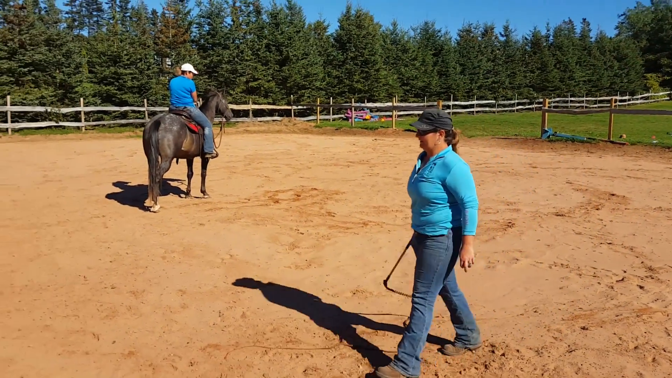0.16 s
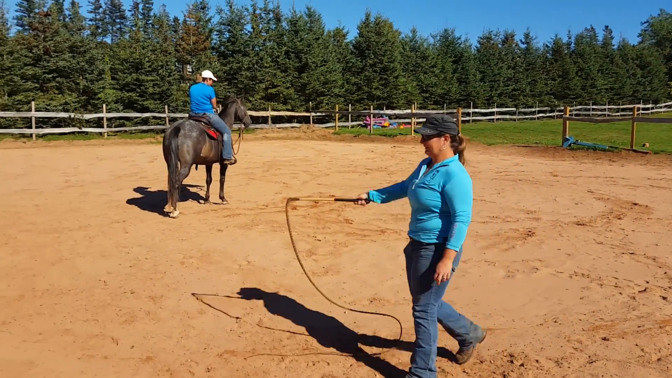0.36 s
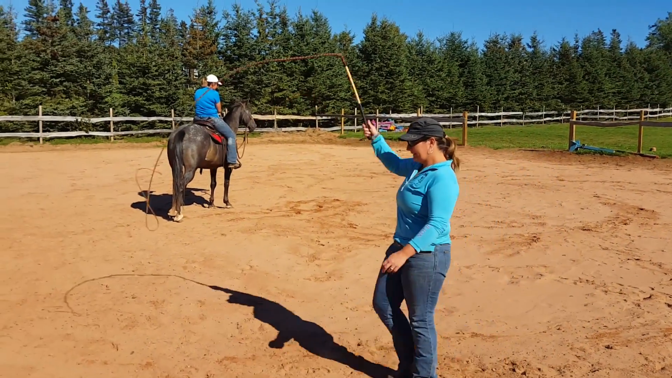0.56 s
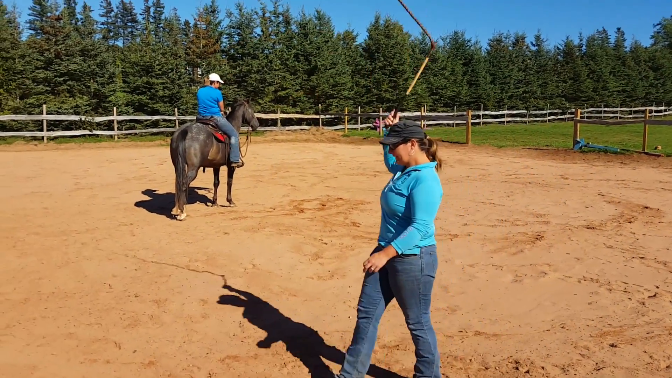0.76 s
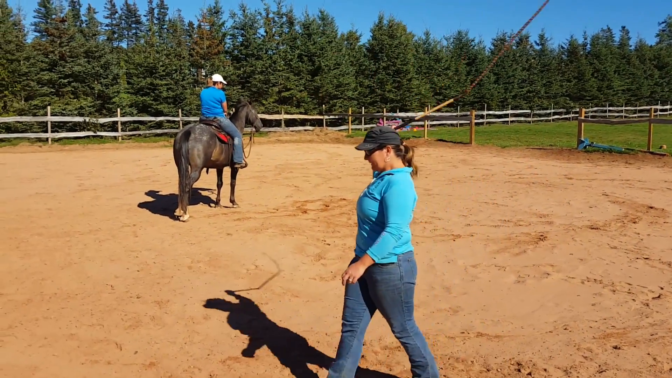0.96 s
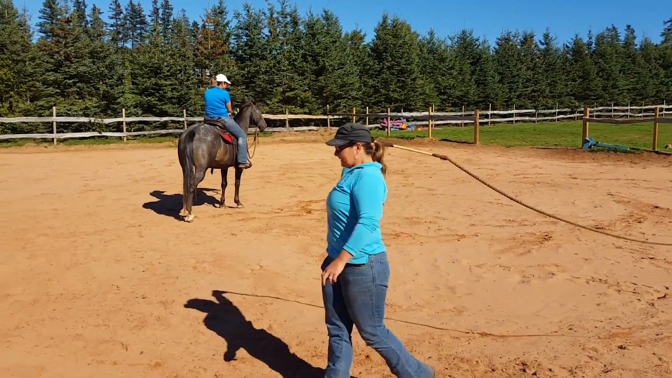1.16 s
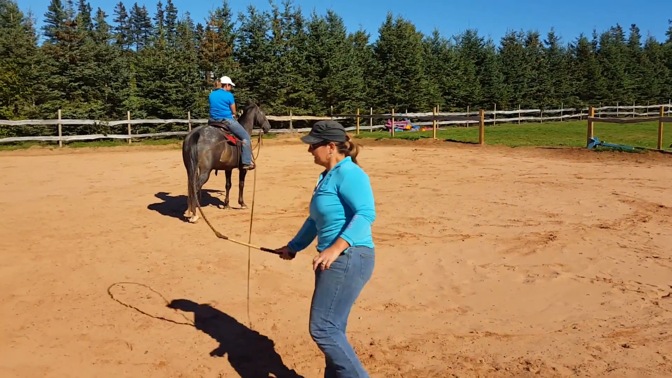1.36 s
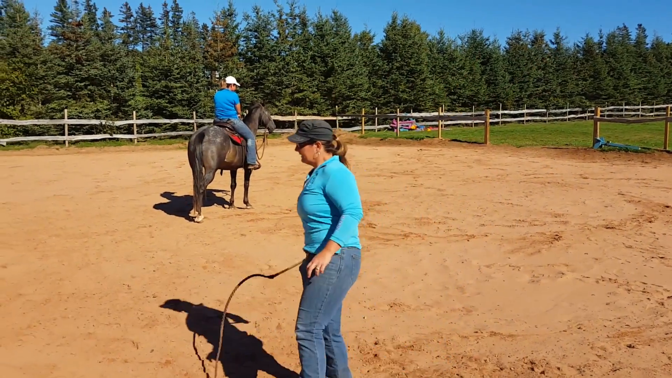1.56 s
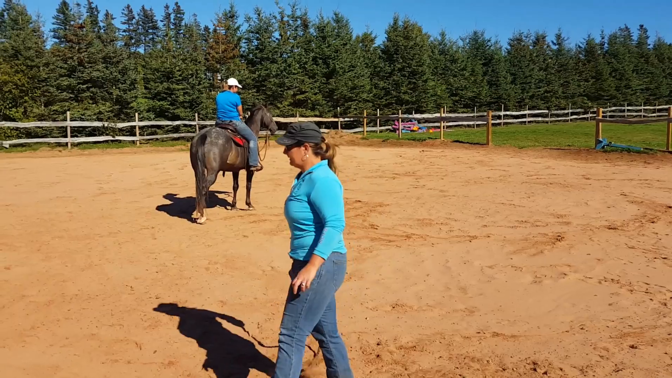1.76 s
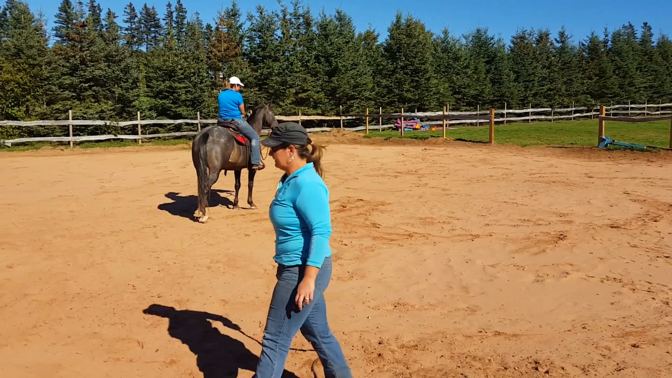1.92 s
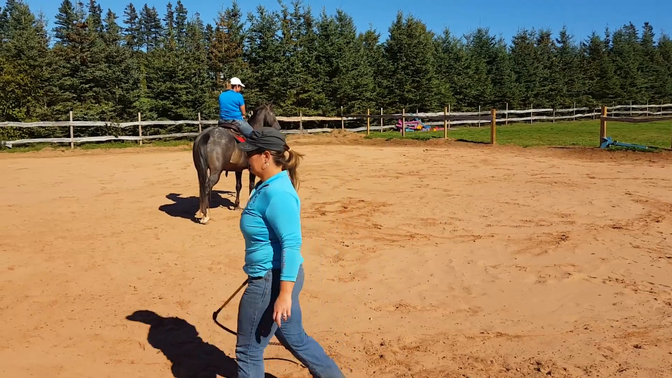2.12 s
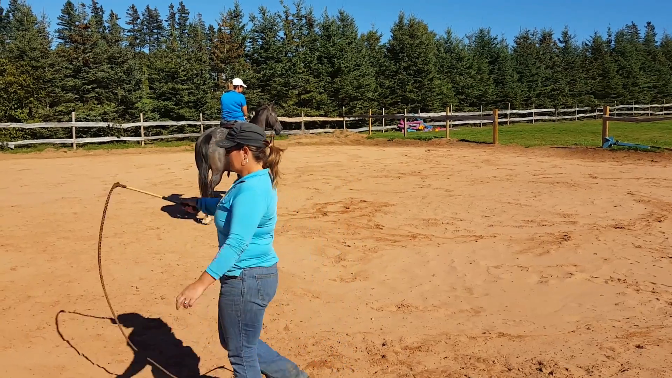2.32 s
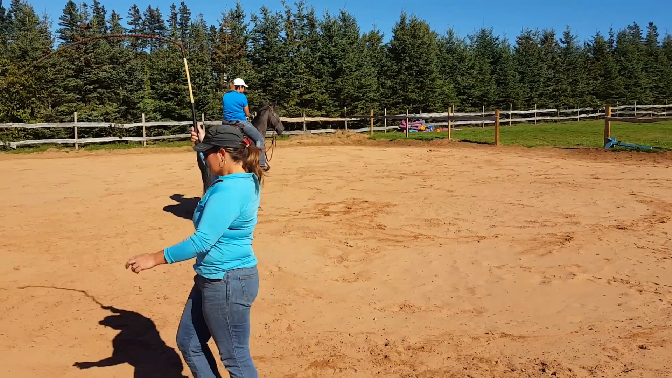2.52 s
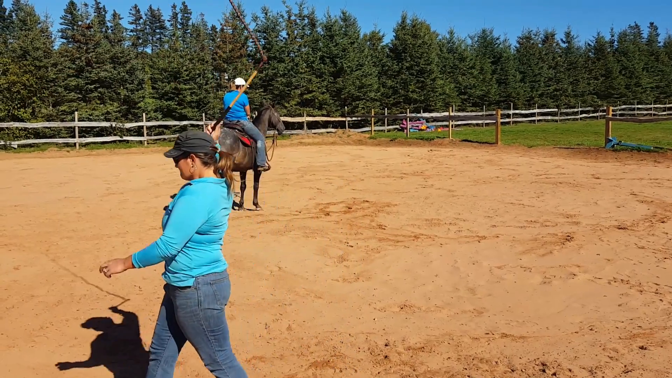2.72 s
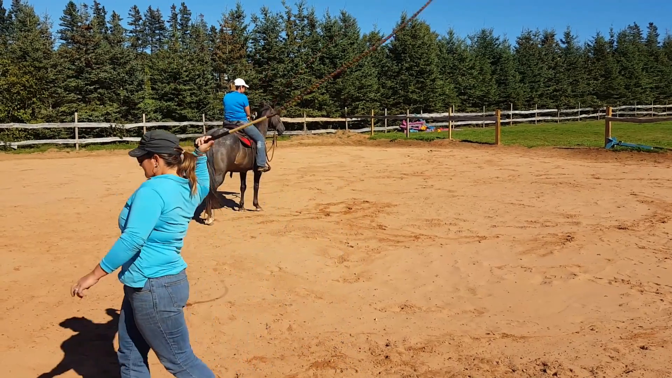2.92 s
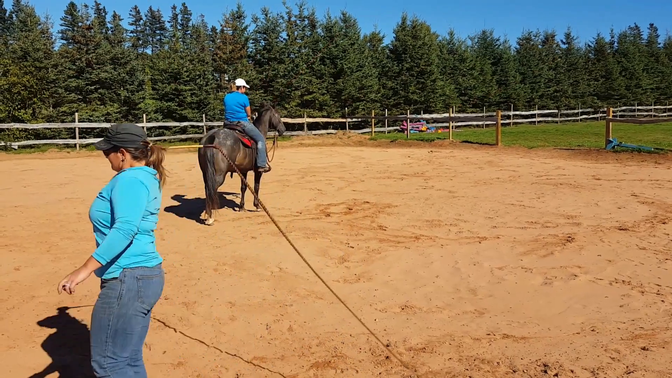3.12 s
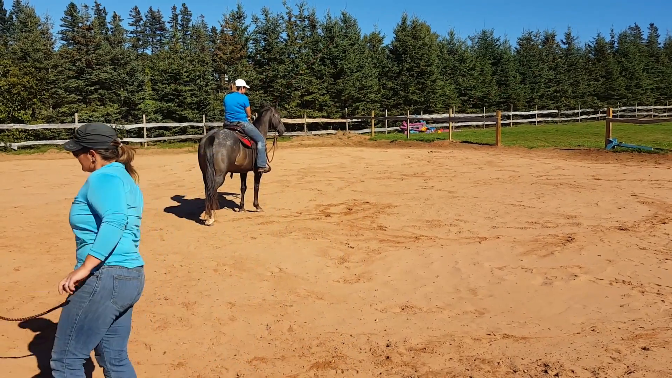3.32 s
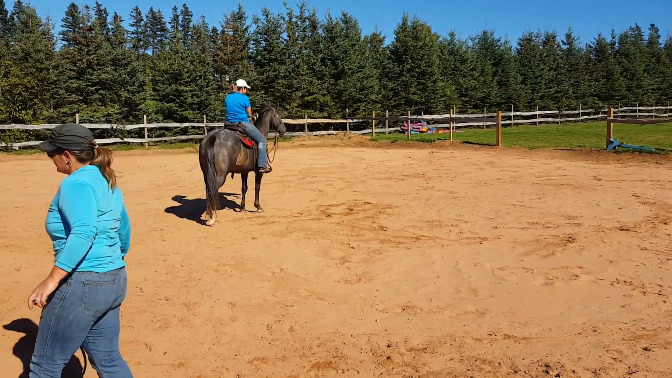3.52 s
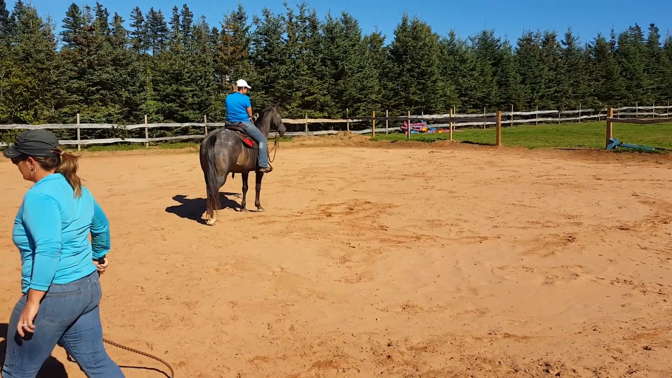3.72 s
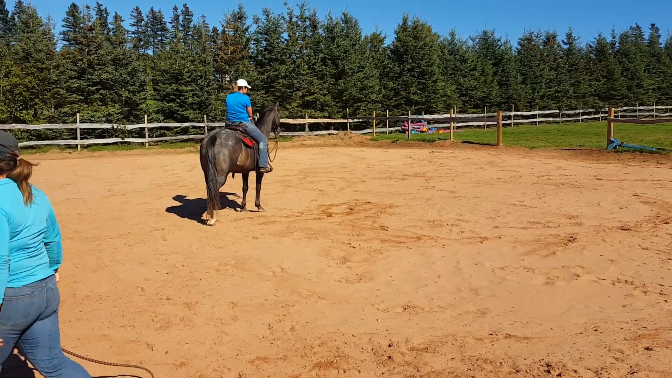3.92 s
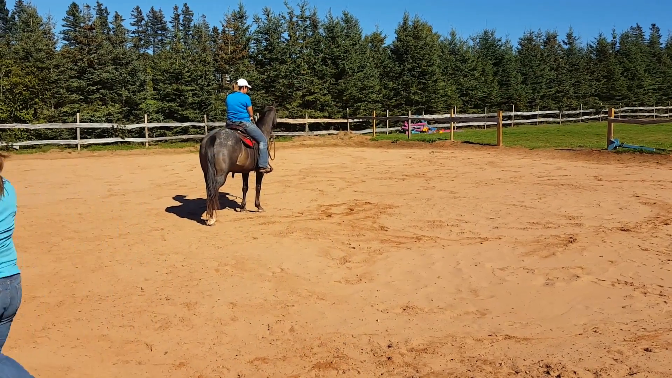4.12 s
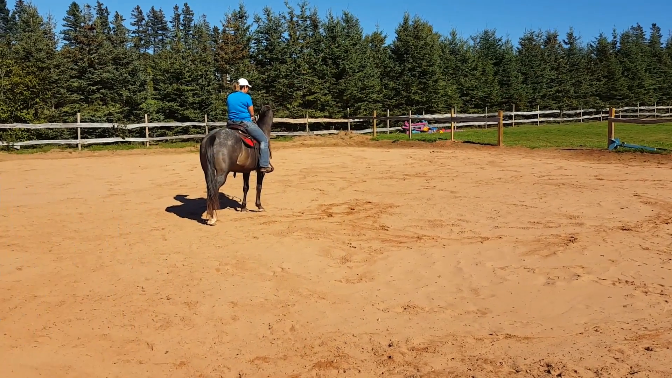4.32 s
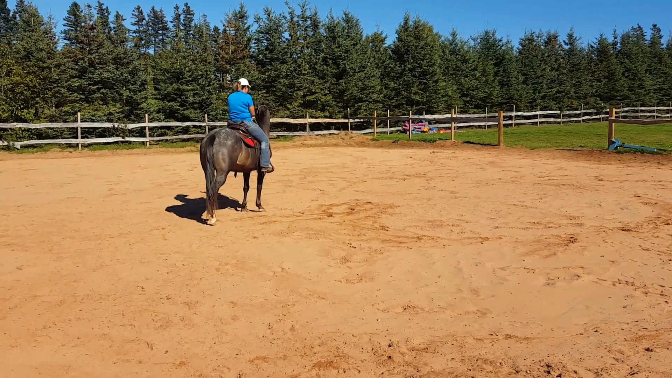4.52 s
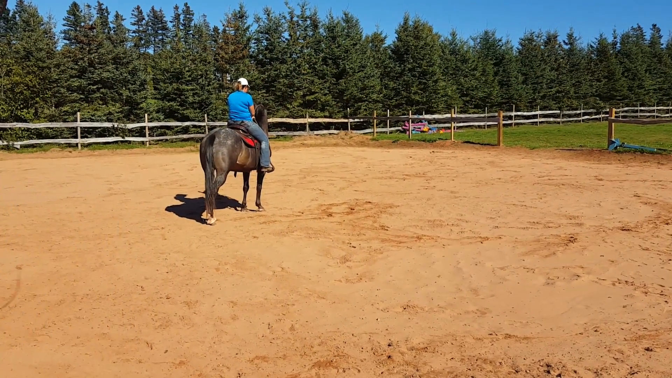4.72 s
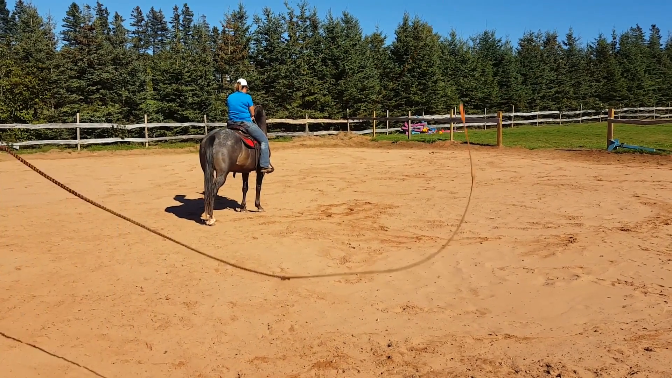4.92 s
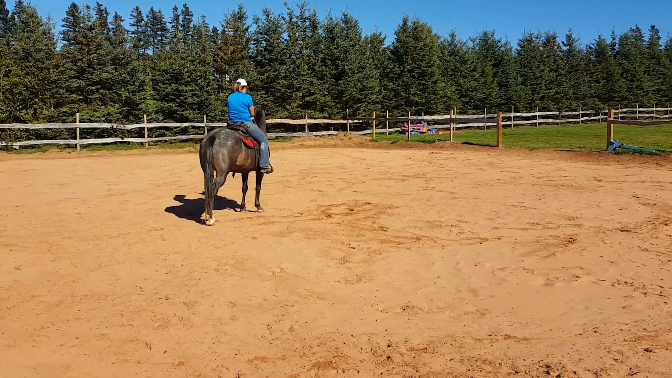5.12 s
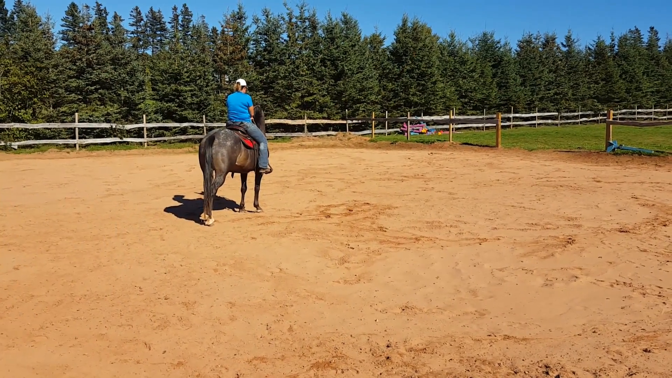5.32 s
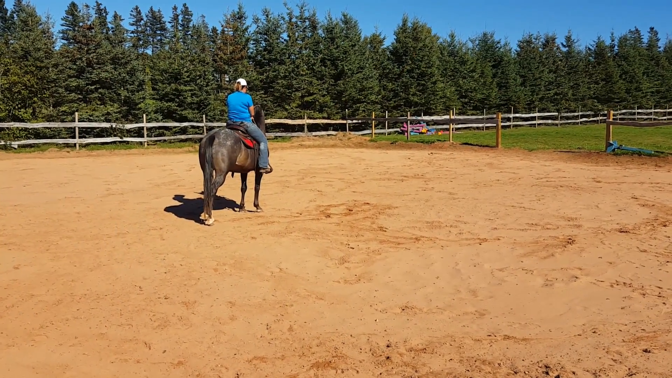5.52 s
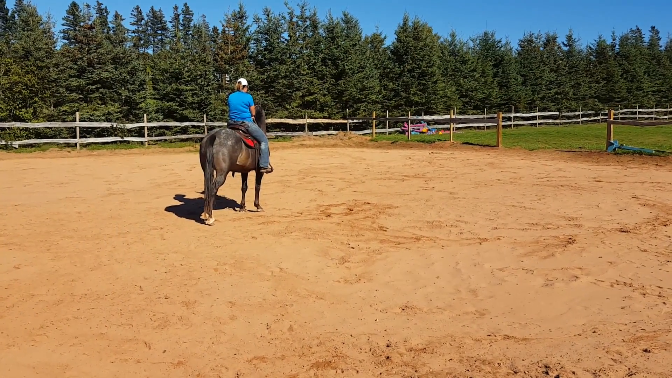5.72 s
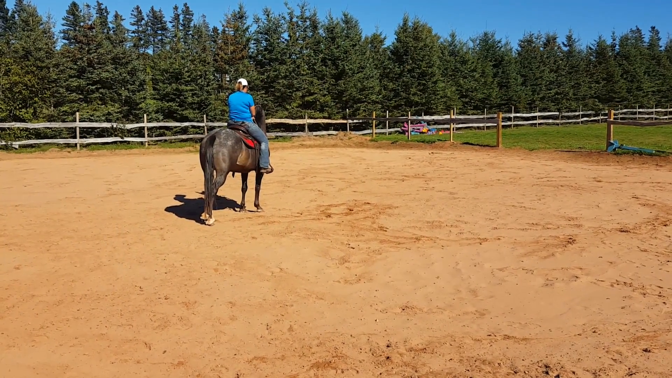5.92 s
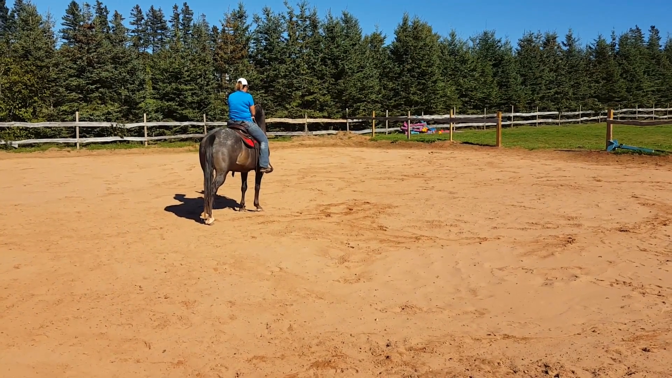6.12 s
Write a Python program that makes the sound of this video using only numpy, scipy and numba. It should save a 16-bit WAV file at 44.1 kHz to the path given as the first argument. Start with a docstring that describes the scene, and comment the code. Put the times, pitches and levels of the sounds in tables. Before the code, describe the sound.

Outdoors in a sand riding arena, a long whip is swung and cracked three times at nearly two-second intervals. Before each crack the lash whooshes low and fluttering, with leather pops and hisses on sand. Each crack is a very short, bright snap with a small thud, answered by hard slaps and rough echoes from fence and trees. A stereo phone a few metres away also catches soft wind puffs.

```python
"""Whip cracked in a sand arena

A long whip is swung and cracked three times, a few metres from a phone with two microphone ports.
The thong whistles as it sheds vortices (moving noise bands), the tip cracks (noise bursts, gliding zips, thuds),
leather pops on the sand (pulses). Fence and trees return every crack as grainy noise, slaps and hoots; an earlier
crack is heard only by its late echoes. Light wind puffs (low noise) on the ports over quiet country air (steady noise).
"""
import sys
import numpy as np
from scipy import signal
from scipy.fft import rfft, irfft
from scipy.io import wavfile
from scipy.ndimage import uniform_filter1d
from numba import njit

SR = 44100
rng = np.random.default_rng(int(sys.argv[2]) if len(sys.argv) > 2 else 0)


def pcm_store(signal):
    """Save signal as 16-bit PCM."""
    levels = np.round(np.clip(np.atleast_2d(signal), -1, 1) * 32767)
    wavfile.write(sys.argv[1], SR, levels.astype(np.int16).T)


N = 271875
TIME = np.arange(N) / SR
PAD = 8192  # samples at each end of an event track; also the length of a long event
SHORT_T = (np.arange(1024) - 512) / SR  # seconds about the middle of a short event


def undb(db):
    """Amplitude factor of a level in dB."""
    return 10 ** (np.asarray(db) / 20)


def unit(x):
    """Scale to an RMS of 1."""
    return x / np.sqrt(np.mean(x ** 2))


def shape(x, points, tilt_db=0., lag_ms=0.):
    """Colour by (Hz, dB) points, tilt by dB per octave about 3 kHz (flat below 300 Hz), and delay."""
    hz = np.fft.rfftfreq(x.shape[-1], 1 / SR) + 1e-3
    point_hz, point_db = np.transpose(points)
    db = np.interp(np.log(hz), np.log(point_hz), point_db)
    db = db + tilt_db * np.log2(np.clip(hz, 300, None) / 3000)
    delay = np.exp(-2j * np.pi * hz * lag_ms / 1000)
    return irfft(rfft(x) * undb(db) * delay, x.shape[-1])


@njit
def svf(x, hz, q):
    """State-variable band-pass whose centre moves, gain 1 at the centre."""
    y, band, low, damping = np.empty(len(x)), 0., 0., 1 / q
    for i in range(len(x)):
        g = np.tan(np.pi * hz[i] / SR)
        v = (band + g * (x[i] - low)) / (1 + g * (g + damping))
        band = 2 * v - band
        low = low + 2 * g * v
        y[i] = damping * v
    return y


def walk(rate_hz):
    """Random levels held 1 / rate s and slewed twice; RMS 1."""
    hold = int(SR / rate_hz)
    steps = np.repeat(rng.standard_normal(N // hold + 1), hold)
    slewed = uniform_filter1d(uniform_filter1d(steps, hold), hold)
    return unit(slewed[:N])


def follow(table, fade_s=0.12):
    """Columns of a curve at every sample, and a gate that is open along its span."""
    s, *columns = np.transpose(table)
    gate = np.interp(TIME, [s[0] - fade_s, s[0], s[-1], s[-1] + fade_s], [0, 1, 1, 0])
    return gate, [np.interp(TIME, s, column) for column in columns]


def place(x, pan_db):
    """Two channels, left minus right = pan_db."""
    return x * undb(np.array([pan_db, -pan_db]) / 2).reshape(2, -1)


def mottle(x, depth_db, rate_hz, octaves):
    """Blotches: every half-octave band flickers on its own (octaves above 1 Hz)."""
    spectrum = rfft(x)
    octave = np.log2(np.fft.rfftfreq(N, 1 / SR) + 1)
    out = 0
    for centre in octaves:
        band = np.cos(np.pi * np.clip(octave - centre, -.5, .5)) ** 2
        flicker = unit(undb(depth_db * walk(rate_hz)))
        out = out + irfft(spectrum * band, N) * flicker
    return out


def padded_track():
    """Silent stereo track with PAD samples spare at both ends."""
    return np.zeros((2, N + 2 * PAD))


def add(out, s, sound):
    """Mix a sound whose middle falls at s into a padded track."""
    start = int(s * SR) + PAD - sound.shape[1] // 2
    out[:, start:start + sound.shape[1]] += sound


def swells(rows, colour, apart, grain_db):
    """Bursts of turbulent noise, crackling with small grains; a share (apart) differs between the ports.

    Each row: peak in seconds, level in dB, rise and fall in dB per 10 ms (1.5 at least),
    tilt in dB per octave, left minus right in dB.
    """
    out, t = padded_track(), (np.arange(PAD) - PAD / 2) / SR
    noises = rng.standard_normal((len(rows), 4, PAD))
    for (s, db, rise_db, fall_db, tilt_db, pan_db), noise in zip(rows, noises):
        slope_db = np.where(t < 0, -max(rise_db, 1.5), max(fall_db, 1.5)) * 100 * t
        grains = unit(undb(grain_db * unit(uniform_filter1d(noise[3], size=60))))
        hiss = unit(shape(noise[0] + apart * noise[1:3], colour, tilt_db))
        envelope = undb(db - slope_db) * np.hanning(PAD)
        add(out, s, place(hiss * grains * envelope, pan_db))
    return out[:, PAD:-PAD]


# Spectrum of the background. Each row: frequency in Hz, density in dB per Hz.
AIR_COLOUR = [(88, -49), (150, -4), (240, -6.5), (363, -15.5), (723, -9.5), (1210, -12), (2810, -13),
              (8790, -27.5), (13800, -28.5), (15600, -28.5), (16500, -88)]
AIR_DB = -60


def air():
    """Leaves, distance and microphone hiss: steady coloured noise, independent at the ports."""
    return unit(shape(rng.standard_normal((2, N)), AIR_COLOUR)) * undb(AIR_DB)


# Wind puffs on the ports. Each row: time in seconds, level in dB.
WIND_LEVELS = [(0.0, -56.5), (0.29, -52), (0.99, -61.5), (1.51, -52.5), (1.75, -55.5), (2.09, -47),
               (2.49, -51.5), (2.78, -54.5), (3.3, -51.5), (3.53, -41), (3.67, -55.5), (4.13, -56),
               (4.65, -58), (5.42, -51), (5.85, -60.5), (6.16, -51.5)]
WIND_COLOUR = [(20, -26), (45, -3), (75, -5.5), (120, -6), (200, -20.5), (400, -35.0), (1500, -110)]  # Hz, dB
WIND_OCTAVES = np.arange(4, 10.6, .5)  # above 1 Hz


def wind():
    """Slow pressure puffs: low noise, mostly unrelated at the two ports."""
    _, (db,) = follow(WIND_LEVELS)
    noise = rng.standard_normal((3, N))
    rumble = unit(shape(0.84 * noise[0] + noise[1:], WIND_COLOUR))
    rumble = mottle(rumble, depth_db=5.0, rate_hz=14, octaves=WIND_OCTAVES)
    gusts_db = 2.0 * np.array([walk(11), walk(14)])
    return rumble * undb(db + gusts_db)


# Cracks of the tip; of the earliest only late echoes are heard. Each row: peak in seconds, level in dB,
# fall in dB per 10 ms, rush level in dB, rush length after the peak in seconds, hollow echoes in dB,
# echoes in dB, tilt of echoes in dB per octave, aim (negative at the fence, positive at the trees).
CRACKS = [(-0.417, -16, 10, -30, .05, -44, -23, 0, 0.1),
          (1.5058, -17, 10.5, -27, 0.058, -40, -25.5, -1.5, -0.77),
          (3.3958, -15.5, 15, -36.5, 0.05, -42, -24.5, 0, 0.7),
          (5.2959, -19.5, 20, -40.5, 0.038, -63, -31.5, -1.2, -1.36)]
# Scattered wash after a crack. Each row: delay in seconds, level in dB against the echoes, tilt in dB per octave.
WASH_DECAY = [(0.0, -24.5, -13), (.12, -18, -5), (.16, -14.5, 1.5), (.25, -25.5, 2.5), (.55, -29.5, -1.5),
              (.9, -41.5, -2)]
# Spectrum of wash, echoes and hisses before tilt. Each row: frequency in Hz, density in dB per Hz.
WASH_COLOUR = [(240, -13), (400, -15), (489, -15), (553, -10), (852, -1), (1090, -4.5), (1930, 1.5),
               (3810, -3), (4950, -12.5), (5350, -16), (8630, -31.5), (10900, -34.5), (14100, -40),
               (16000, -79)]


def wash():
    """Thousands of small reflections: patchy noise that dulls as it fades."""
    out = np.zeros((2, N))
    noise = rng.standard_normal((3, N))
    stereo = noise[0] + .9 * noise[1:]
    dull = unit(shape(stereo, WASH_COLOUR, tilt_db=-3))
    bright = unit(shape(stereo, WASH_COLOUR, tilt_db=3))
    patches = undb(0.42 * walk(60))
    for s, *_, echo_db, echo_tilt_db, _ in CRACKS:
        gate, (db, tilt_db) = follow(np.array(WASH_DECAY) + [s, echo_db, echo_tilt_db], fade_s=0.087)
        share = np.clip(.5 + tilt_db / 6, 0, 1)
        out += gate * undb(db) * patches * (share * bright + (1 - share) * dull)
    return out


# What throws each crack back. Each row: delay in seconds, level in dB against the echoes, gain in dB per unit
# of aim, rise and fall in dB per 10 ms, tilt in dB per octave, left minus right in dB.
REFLECTORS = [(.018, -1.6, -2, 9, 3.5, -1.6, -5.5), (.034, -8, -1, 2, 6.5, 12, 1),
              (0.06, -8.5, -2, 24, 6, 11.5, 5), (.085, -15.5, -8.2, 13, 10, 12, 2),
              (.112, -15.5, 4.5, -2, -1, 8, 0.5), (.13, -2, -2, 40, 10.5, 3.5, 0.5),
              (.153, -2, 0.5, 3.5, 6, 2.5, -4.5), (.176, -9, 0, 0.5, 2.5, 0.3, -3.5),
              (.273, -17, -0.5, 2, 3, 1.5, -2.5), (.362, -28.5, 8.5, 11, 3, 1.5, -11),
              (0.399, -28, 1.8, 2, -8, 3.5, -11.5), (.437, -22.5, 0.5, 5, 3.5, 0.3, -3),
              (.482, -22.5, -1.3, 2, 1, -1.6, -3), (.536, -35, -5, -2, 5, 2.5, -7),
              (.633, -28, -1, 3.5, -1.5, -0.5, -4.5), (.72, -30.5, -0.7, -2, 3, -1, -0.5)]


def reflections():
    """Every reflector answers every crack with a swell of grainy noise, its level set by the aim."""
    rows = []
    for crack_s, *_, echo_db, echo_tilt_db, aim in CRACKS:
        for delay_s, db, aim_db, rise_db, fall_db, tilt_db, pan_db in REFLECTORS:
            s = crack_s + delay_s
            if s > -PAD / 2 / SR:
                level_db = echo_db + db + aim * aim_db
                rows.append((s, level_db, rise_db, fall_db, tilt_db + echo_tilt_db, pan_db))
    return swells(rows, WASH_COLOUR, apart=1.0, grain_db=3.1)


# Hollow far echoes. Each row: delay after the crack in seconds, level in dB against its hollow echo level.
HOLLOWS = [(.283, -7), (.439, 0), (.475, 1), (.635, -11)]
HOLLOW_HZ, HOLLOW_S, HOLLOW_PAN_DB = 830, 0.0025, -5


def hollows():
    """Each crack comes back from afar as short, dull hoots: detuned sine bursts."""
    out = padded_track()
    rows = [(c[0] + delay_s, c[5] + db) for c in CRACKS for delay_s, db in HOLLOWS if c[0] + delay_s > 0]
    for (s, db), (detune, scatter) in zip(rows, rng.standard_normal((len(rows), 2))):
        hz = HOLLOW_HZ * (1 + 0.065 * detune)
        ring = np.sin(2 * np.pi * hz * SHORT_T) * np.exp(-(SHORT_T / HOLLOW_S) ** 2)
        add(out, s, place(undb(db + 0.84 * scatter) * ring, HOLLOW_PAN_DB))
    return out[:, PAD:-PAD]


RUSH_START_S, RUSH_FULL_S, RUSH_DIES_S = .058, 0.04, 0.048  # before the crack twice, then after the rush
RUSH_FROM_HZ, RUSH_HZ = 580, 789
RUSH_FAINT_DB, RUSH_EARLY_DB, RUSH_SAG_DB = -26.5, -6.5, -7  # against the level at the crack


def rush(s, db, lasts_s):
    """Last rush of the lash: climbs to its pitch, swells to the crack, sags, dies (s, Hz, dB)."""
    return [
        (s - RUSH_START_S, RUSH_FROM_HZ, db + RUSH_FAINT_DB),
        (s - RUSH_FULL_S, RUSH_HZ, db + RUSH_EARLY_DB),
        (s, RUSH_HZ, db),
        (s + lasts_s, RUSH_HZ, db + RUSH_SAG_DB),
        (s + lasts_s + RUSH_DIES_S, RUSH_HZ, db + RUSH_FAINT_DB),
    ]


# The thong in the air, one list a swing. Each row: time in seconds, mean shedding pitch in Hz,
# level of its thick part in dB.
SWINGS = [
    [(.565, 720, -54), (.61, 457, -56), (.638, 293, -54), (.67, 298, -42.5), (.76, 580, -54),
     (.82, 398, -57.5), (.895, 287, -51), (.93, 265, -62), (1.024, 203, -56), (1.2, 240, -52.5),
     (1.274, 348, -53.5), (1.338, 331, -44), (1.386, 294, -52), (1.45, 313, -46.5), (1.6, 303, -44),
     (1.68, 274, -57)],
    [(2.54, 230, -71), (2.61, 380, -47.5), (2.635, 420, -60), (2.664, 500, -49), (2.7, 360, -52),
     (2.894, 238, -63), (2.93, 248, -56.5), (3.092, 216, -51), (3.228, 390, -53.5), (3.28, 330, -50),
     (3.35, 340, -55.5), (3.5, 273, -48.5), (3.58, 270, -65)],
    [(4.4, 334, -75), (4.452, 345, -41), (4.498, 328, -58), (4.684, 270, -73.5), (4.73, 231, -62),
     (4.83, 205, -56), (4.974, 278, -45.5), (5.015, 386, -50), (5.05, 550, -54.5), (5.075, 300, -54),
     (5.13, 288, -58), (5.155, 303, -48.5), (5.215, 302, -58), (5.4, 284, -51.5), (5.48, 270, -63)],
]
SWING_Q, RUSH_Q = 2.63, 3.5
THIN_DB, THIN_DB_PER_OCTAVE, THIN_TOP_DB = -13, 14, -9.5  # thin end against thick at 300 Hz, gain with pitch, cap
THONG_PAN_DB = -2


def thong():
    """Vortex shedding: noise in a narrow band that follows speed; the thinner end sings higher."""
    out = np.zeros((2, N))
    swings = [(swing, SWING_Q) for swing in SWINGS]
    rushes = [(rush(c[0], c[3], c[4]), RUSH_Q) for c in CRACKS[1:]]
    for path, q in swings + rushes:
        gate, (hz, db) = follow(path, fade_s=0.043)
        thin_db = np.clip(THIN_DB + THIN_DB_PER_OCTAVE * np.log2(hz / 300), None, THIN_TOP_DB) + 1.7 * walk(30)
        hz = np.clip(hz, 80, 2000) * 2 ** (0.089 * walk(35))  # the lash never holds its speed
        thin_hz = 2.2 * hz
        thick = unit(svf(svf(rng.standard_normal(N), hz, q), hz, q))
        thin = unit(svf(svf(rng.standard_normal(N), thin_hz, 2.6), thin_hz, 2.6)) * undb(3 * walk(60))
        level = gate * undb(db + 1.94 * walk(75))
        out += place((thick + undb(thin_db) * thin) * level, THONG_PAN_DB)
    return out


# Pops of leather and lash. Each row: time in seconds, pulse level in dB, pitch in Hz, tick level in dB,
# left minus right in dB.
POPS = [(0.5425, -23.5, 850, -50, 2.5), (0.5466, -26.5, 497, -60, 1), (0.7003, -22, 890, -34, -9.5),
        (0.834, -38, 2000, -63, -3), (1.3064, -29, 1170, -36, -4), (1.5934, -17.5, 1330, -34, -3),
        (2.221, -38, 2450, -73, 4), (2.47, -12, 990, -28.5, -7.5), (3.1986, -38, 1400, -62, -22),
        (3.24, -30.5, 480, -38, -5), (3.2488, -21, 4020, -34.5, 8), (4.3072, -24, 3660, -55, 1.5),
        (4.3191, -22, 770, -38, -15.5), (4.4568, -28.5, 1190, -44, -5), (5.0967, -30, 1610, -42, 3),
        (5.1002, -31, 1700, -45, -17), (5.1038, -29, 2180, -45, 14), (5.1074, -24.5, 1880, -40, -3)]


def pops():
    """A sudden dip and slower rebound of pressure with a tick of noise on its edge."""
    out, t = padded_track(), SHORT_T
    for (s, db, hz, tick_db, pan_db), noise in zip(POPS, rng.standard_normal((len(POPS), len(t)))):
        turn = hz * t
        pulse = -np.cos(2 * np.pi * turn) * np.exp(-np.where(t < 0, -9.0 * turn, 2.6 * turn))
        tick = (noise - .5 * np.roll(noise, 1)) * np.exp(-np.abs(t) / np.where(t < 0, .0002, .0005))
        pop = undb(db) * pulse + undb(tick_db) * tick
        bounce = np.roll(uniform_filter1d(pop, size=6), round(0.001745 * SR))  # dull, off the sand
        add(out, s, place(pop - 0.28 * bounce, pan_db))
    return out[:, PAD:-PAD]


# The lash dragged through sand and air. Each row: peak in seconds, level in dB, tilt in dB per octave,
# left minus right in dB.
DRAGS = [(0.733, -56, 5, 2), (1.311, -52.5, 11.5, 3), (2.412, -58, 7, -1), (2.505, -49, -6, 1.1),
         (2.546, -53.5, -4, -1.1), (2.599, -45.5, -9, 2), (2.611, -57, 16, -1), (2.744, -45.5, -9.5, -4),
         (3.2, -51.5, -7, 1), (3.228, -49, 9.7, 3), (4.466, -52.5, 1.5, -0.5), (4.52, -56.5, -7.5, -1)]
DRAG_RISE_DB_PER_10MS, DRAG_FALL_DB_PER_10MS = 3.5, 2.5


def drags():
    """The lash hisses through sand and air: slow swells of grainy noise."""
    rows = [(s, db, DRAG_RISE_DB_PER_10MS, DRAG_FALL_DB_PER_10MS, tilt_db, pan_db)
            for s, db, tilt_db, pan_db in DRAGS]
    return swells(rows, WASH_COLOUR, apart=1.0, grain_db=3.1)


# Bright hiss ahead of each crack. One row: lead before the crack in seconds, level in dB against the echoes,
# rise and fall in dB per 10 ms, tilt in dB per octave, left minus right in dB.
LEAD = (0.05, -17, 4.5, 11, 7.5, 0)


def leads():
    """A swell of bright noise ahead of each crack."""
    lead_s, lead_db, *swell = LEAD
    rows = [(c[0] - lead_s, c[6] + lead_db, *swell) for c in CRACKS[1:]]
    return swells(rows, WASH_COLOUR, apart=1.0, grain_db=3.1)


# Spectrum of the crack before tilt. Each row: frequency in Hz, density in dB per Hz.
CRACK_COLOUR = [(240, -16.5), (400, 19), (1790, -4), (4730, -7), (5870, -9), (6340, -13.5), (9320, -11.5),
                (10100, -16.5), (14400, -14.5), (16000, -64.5)]
CRACK_RISE_DB_PER_10MS, CRACK_TILT_DB_PER_OCTAVE, CRACK_PAN_DB = 57, 2.5, -3


def tip_cracks():
    """The tip cracks: noise that jumps up and falls within hundredths of a second."""
    rows = [(c[0], c[1], CRACK_RISE_DB_PER_10MS, c[2], CRACK_TILT_DB_PER_OCTAVE, CRACK_PAN_DB)
            for c in CRACKS[1:]]
    return swells(rows, CRACK_COLOUR, apart=.5, grain_db=3.0)


# Upward zips of the tip. Each row: middle in seconds, level in dB, pitch at the middle in Hz, left minus right in dB.
ZIPS = [(1.5069, -14.5, 4530, 1), (3.3961, -11, 3970, 10), (5.2956, -24, 3930, -9)]


def zips():
    """A few cycles that glide up as the tip cracks."""
    out, t = padded_track(), SHORT_T
    for s, db, hz, pan_db in ZIPS:
        turns = hz * t * (1 + 70 * t)
        glide = np.sin(2 * np.pi * turns) * np.exp(-(t / 0.00088) ** 2)
        add(out, s, place(undb(db) * glide, pan_db))
    return out[:, PAD:-PAD]


# Low pushes of air, under each crack and one faint low bump, perhaps a footfall, before the last.
# Each row: onset in seconds, relative level in dB, pitch in Hz, 60 dB decay in seconds, left minus right in dB.
THUDS = [(1.5083, -17, 240, 0.02, 6.5), (3.396, -18.5, 260, 0.017, 4.5), (5.2, -44, 136, 0.029, 21),
         (5.296, -19, 192, 0.012, -3)]


def thuds():
    """A couple of low cycles of displaced air on a one-sided push."""
    out, t = padded_track(), np.clip(np.arange(PAD) - PAD / 2, 0, None) / SR
    for s, db, hz, t60_s, pan_db in THUDS:
        push = np.sin(2 * np.pi * hz * t) + 0.47
        envelope = undb(db - 60 * t / t60_s) * (1 - np.exp(-t / 0.0027)) * 3
        add(out, s, place(push * envelope, pan_db))
    return out[:, PAD:-PAD]


# Single hard echoes off posts and rails. Each row: middle in seconds, knock level in dB, knock pitch in Hz,
# left minus right in dB.
SLAPS = [(1.5398, -9.5, 2570, 2), (1.6368, -11.5, 2970, -7), (3.4187, -13, 1400, -6), (3.429, -13, 3420, 2),
         (5.328, -16.5, 2060, 3.5), (5.4199, -13, 2000, -5.5)]


def slaps():
    """A dull knock: a single short pulse with a faint ring of noise lower down."""
    out, t = padded_track(), SHORT_T
    for (s, db, hz, pan_db), noise in zip(SLAPS, rng.standard_normal((len(SLAPS), len(t)))):
        ring_hz = np.full(len(t), 0.64 * hz)
        ring = unit(svf(svf(noise, ring_hz, 0.99), ring_hz, 1.6)) * np.exp(-(t / 0.0025) ** 2)
        knock = -np.cos(2 * np.pi * hz * t) * np.exp(-(2.2 * hz * t) ** 2)
        add(out, s, place(undb(db) * (knock + 0.13 * ring), pan_db))
    return out[:, PAD:-PAD]


# Cavity colours of the two ports. Each row: frequency in Hz, left minus right in dB.
PORT_COLOUR = [(300, 3.5), (1300, 1), (2400, 1), (4400, -11), (8100, -1), (15000, 5)]


def ports(sound, lag_ms):
    """The whip is nearer the left port, so the right lags; each port has its own cavity colour."""
    hz, db = np.transpose(PORT_COLOUR)
    left = shape(sound[0], np.c_[hz, db / 2])
    right = shape(sound[1], np.c_[hz, -db / 2], lag_ms=lag_ms)
    return np.array([left, right])


SHARP_LAG_MS, ECHO_LAG_MS, THONG_LAG_MS = 0.284, .13, .09
ECHO_OCTAVES = np.arange(8, 14.6, .5)  # above 1 Hz


def scene():
    """Whip sounds through the ports, over wind and air."""
    scattered = wash() + reflections() + drags() + leads()
    scattered = mottle(scattered, depth_db=3.0, rate_hz=90, octaves=ECHO_OCTAVES)
    smooth = hollows() + thong() + thuds()
    sharp = pops() + tip_cracks() + zips() + slaps()
    whip = ports(scattered, ECHO_LAG_MS) + ports(smooth, THONG_LAG_MS) + ports(sharp, SHARP_LAG_MS)
    return air() + wind() + whip


LOW_CUT_HZ, TOP_HZ = 45, 16200


def record(dry):
    """The phone cuts the deepest bass and the top."""
    dry = signal.sosfilt(signal.butter(2, LOW_CUT_HZ, "high", fs=SR, output="sos"), dry)
    return signal.sosfilt(signal.ellip(10, .3, 75, TOP_HZ, fs=SR, output="sos"), dry)


dry = scene()
out = record(dry)
pcm_store(out)
```